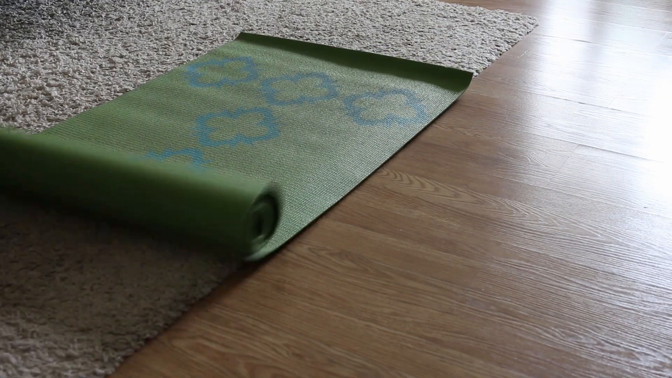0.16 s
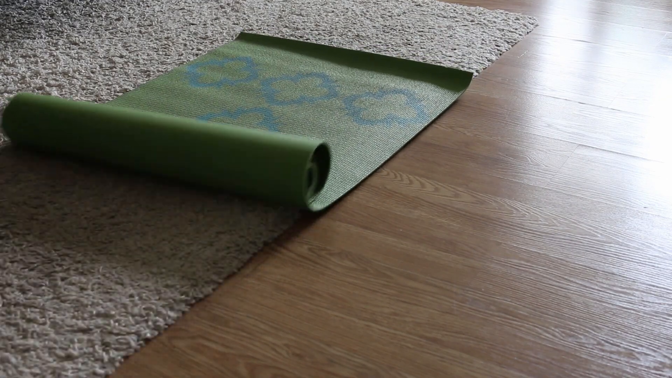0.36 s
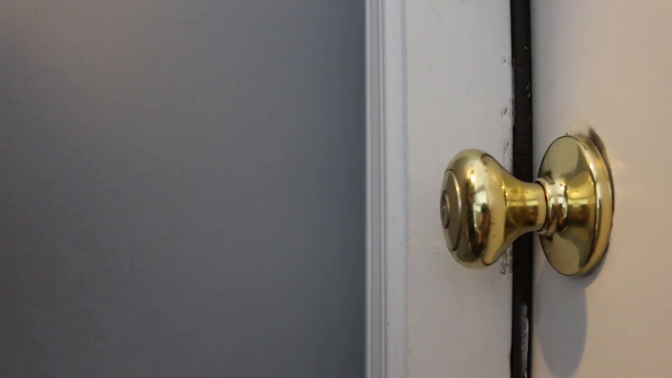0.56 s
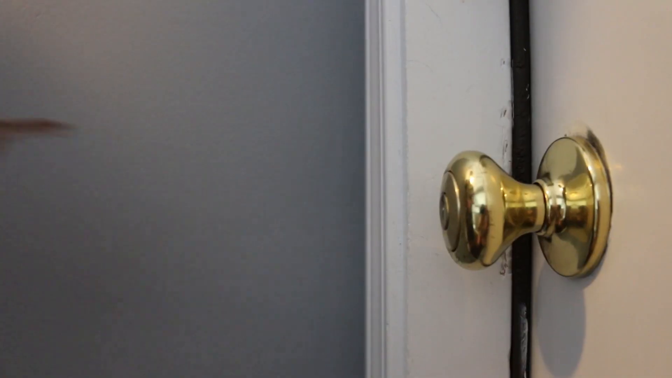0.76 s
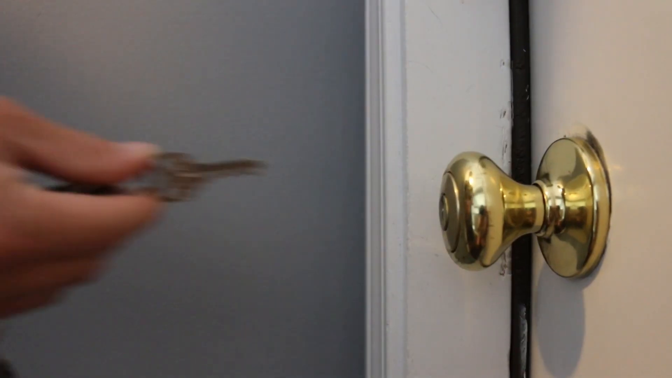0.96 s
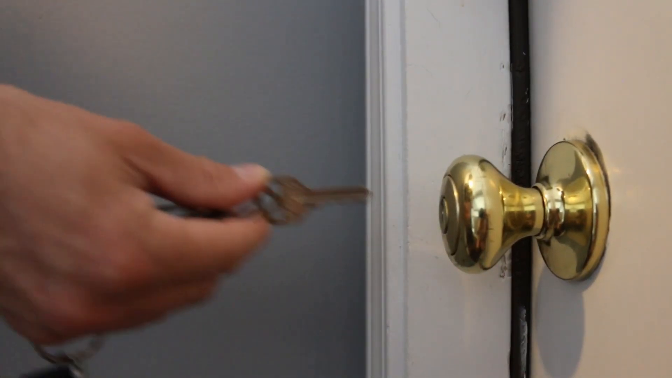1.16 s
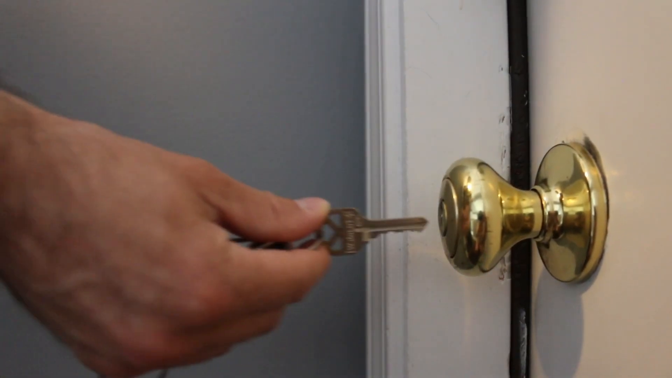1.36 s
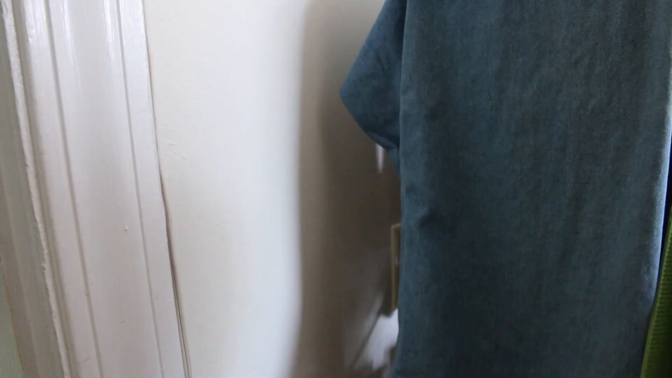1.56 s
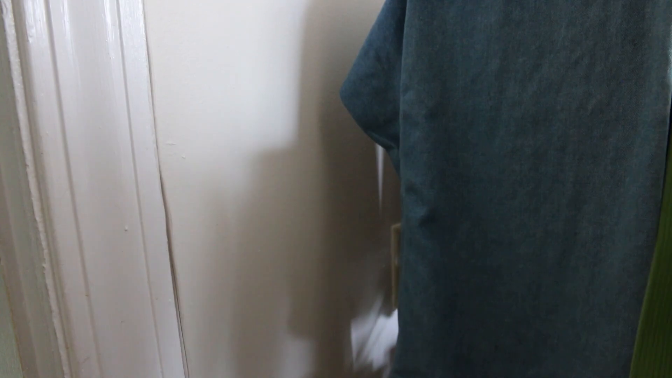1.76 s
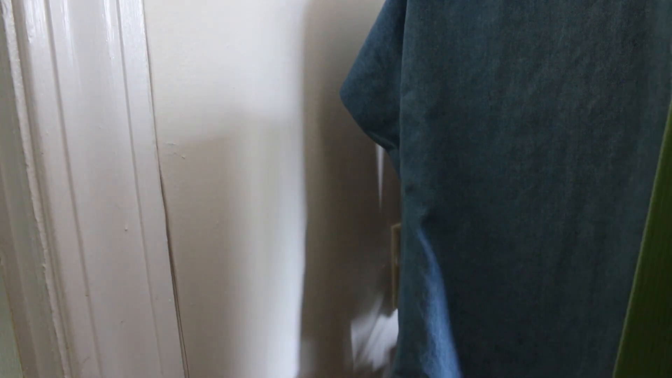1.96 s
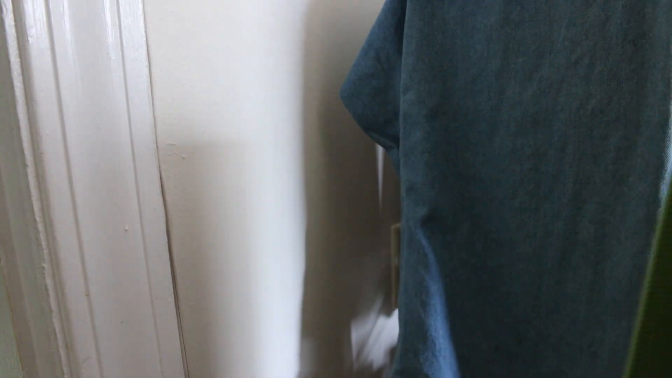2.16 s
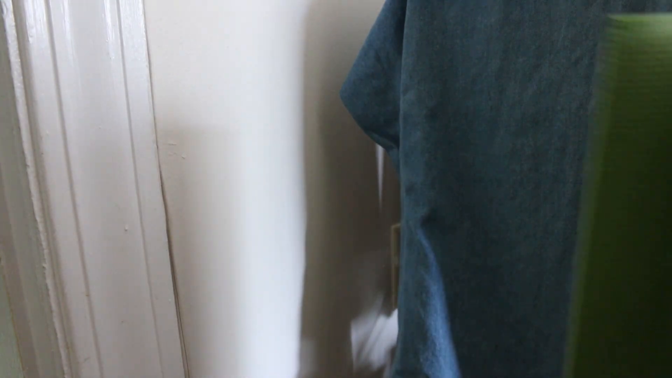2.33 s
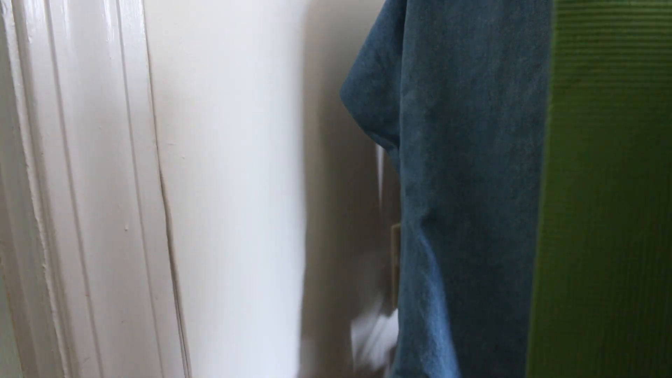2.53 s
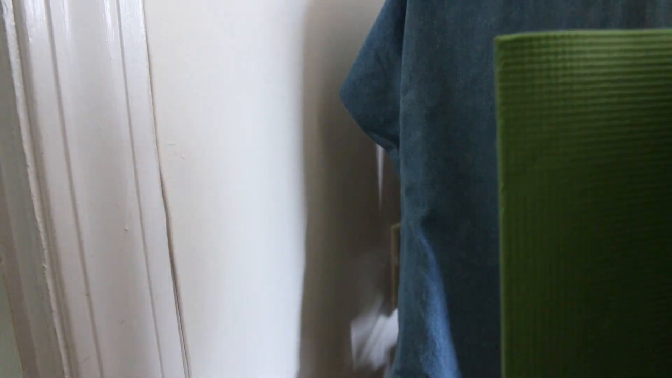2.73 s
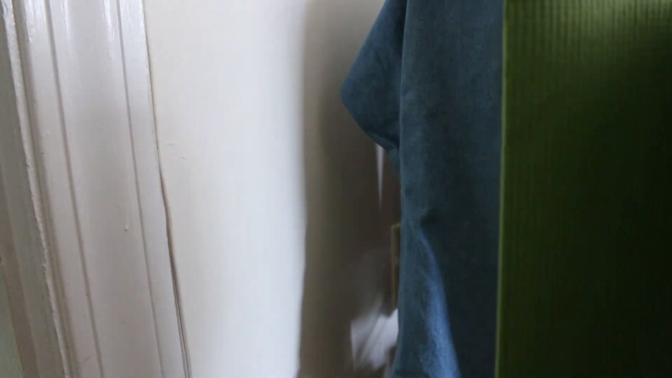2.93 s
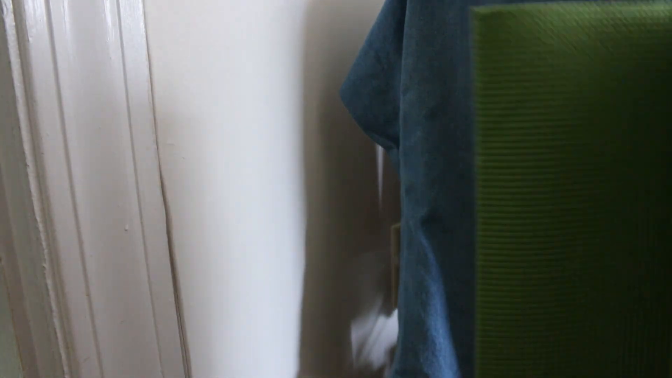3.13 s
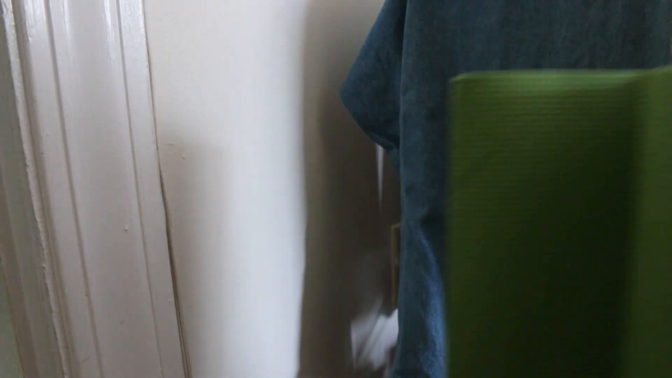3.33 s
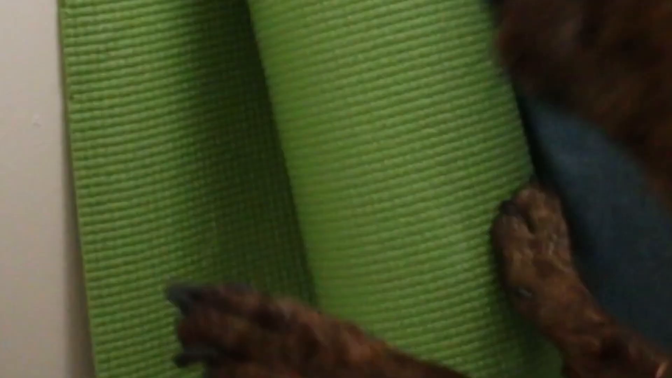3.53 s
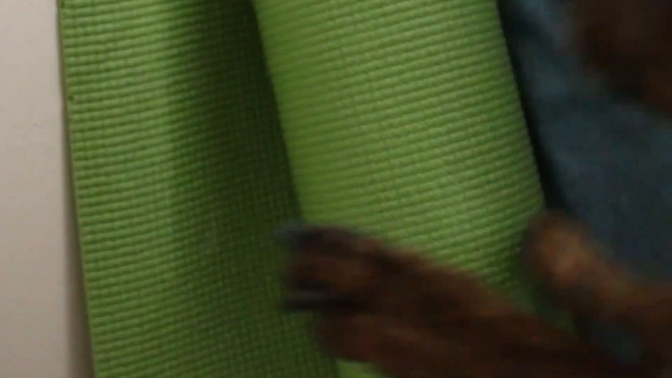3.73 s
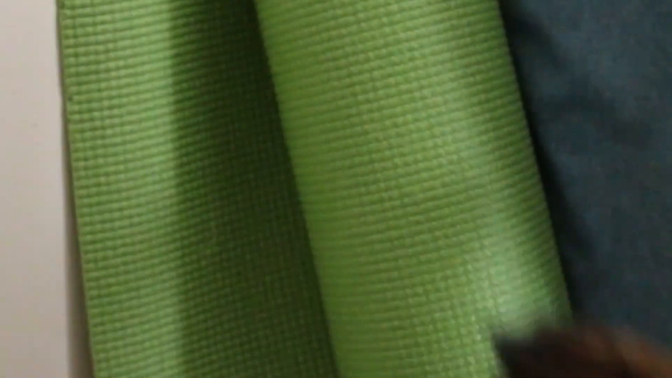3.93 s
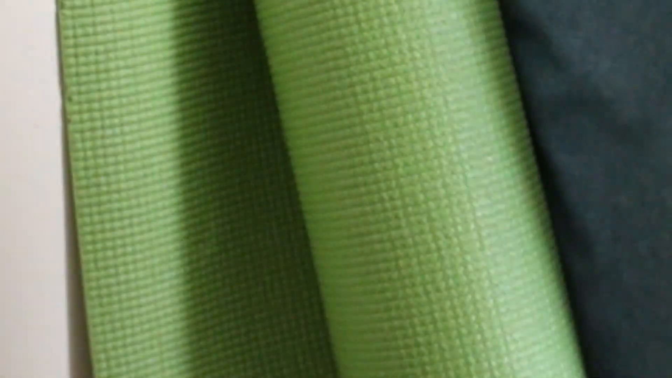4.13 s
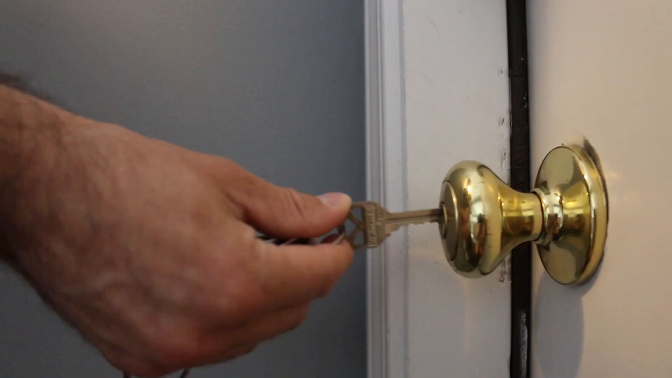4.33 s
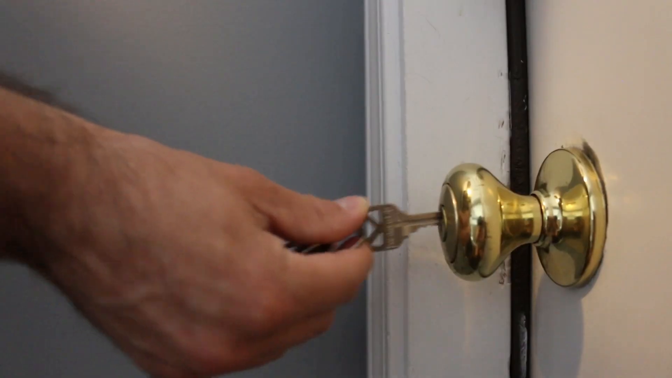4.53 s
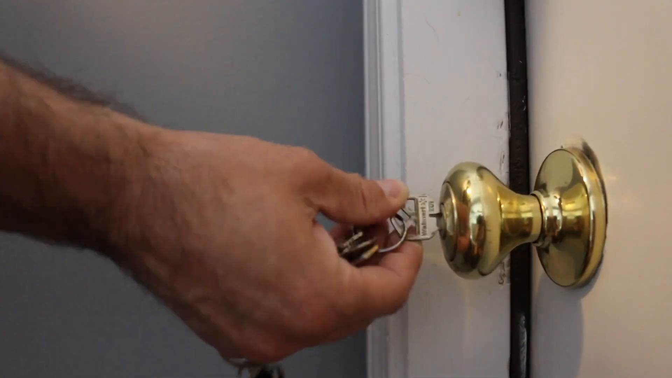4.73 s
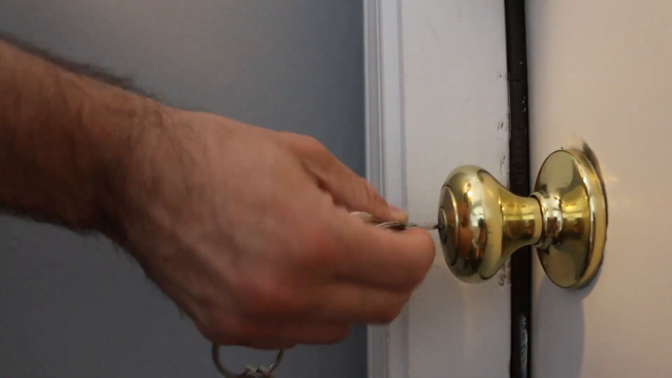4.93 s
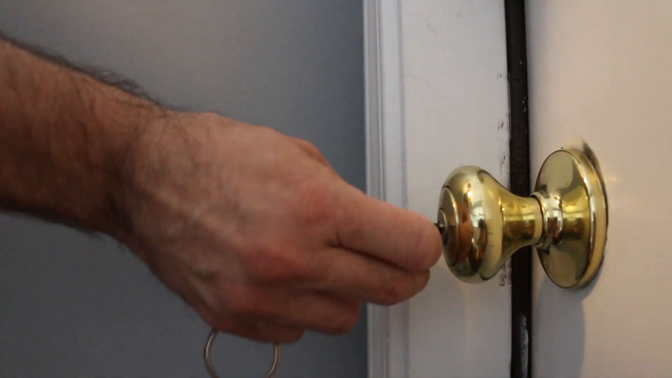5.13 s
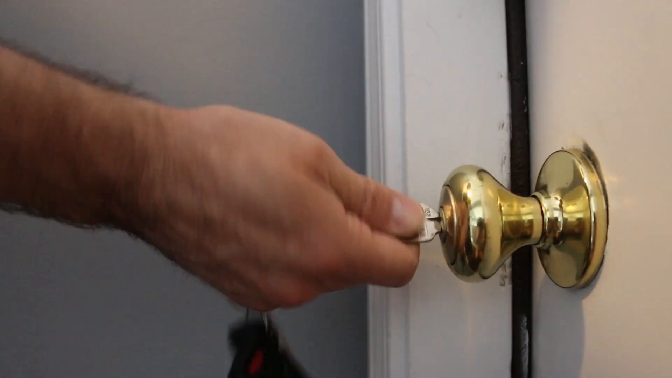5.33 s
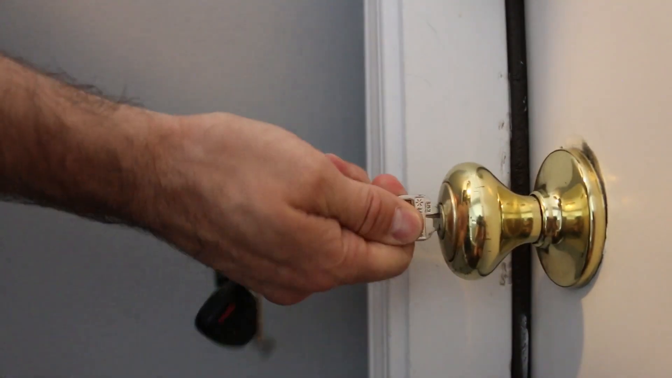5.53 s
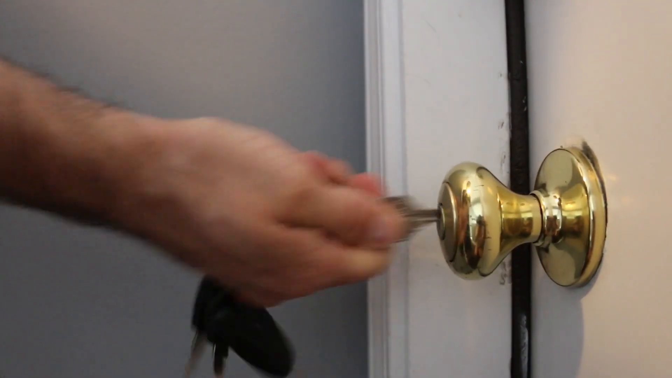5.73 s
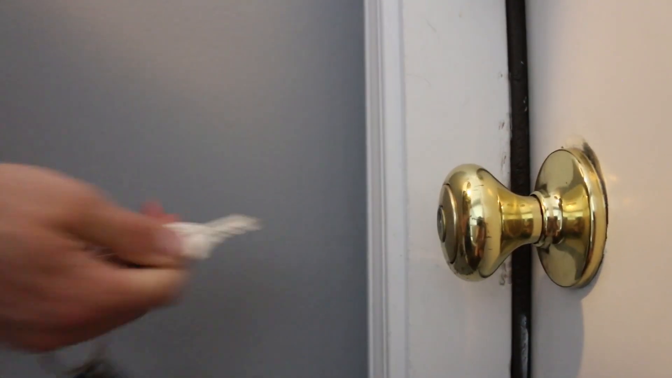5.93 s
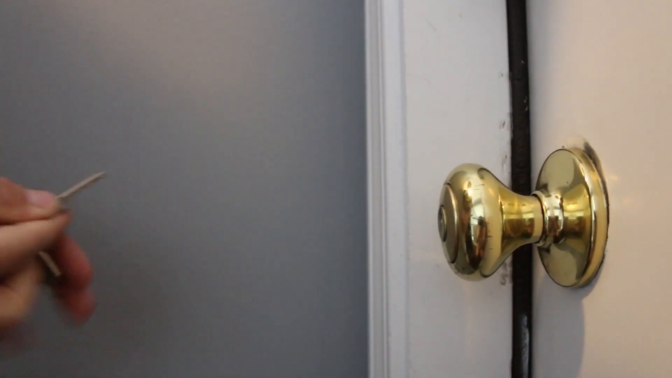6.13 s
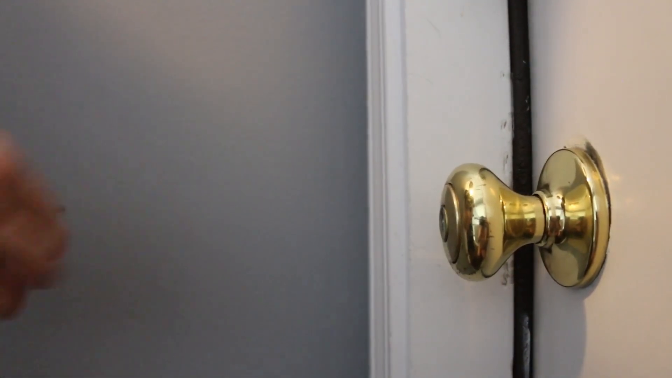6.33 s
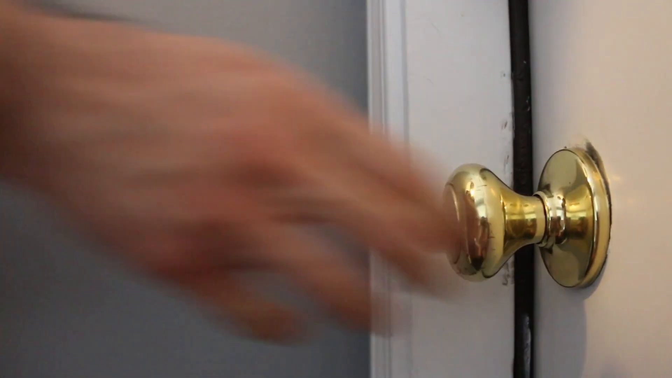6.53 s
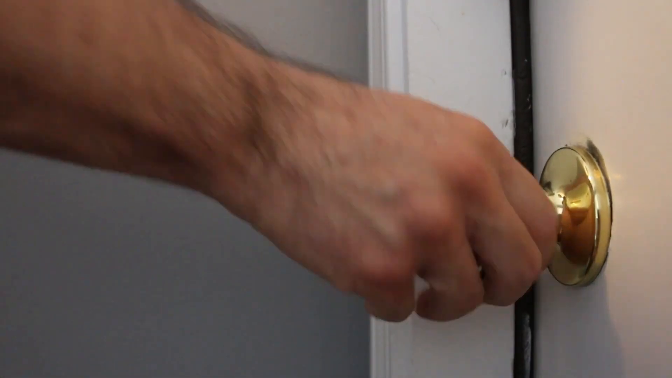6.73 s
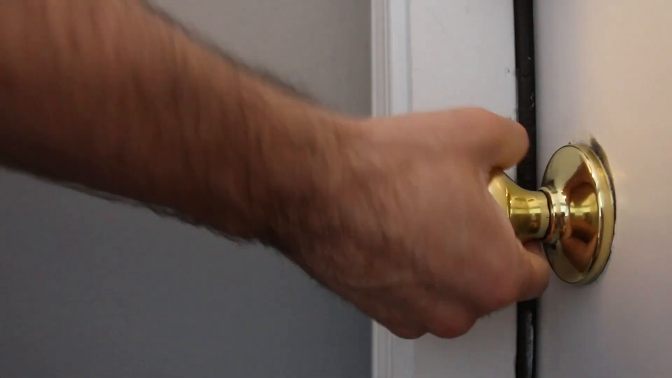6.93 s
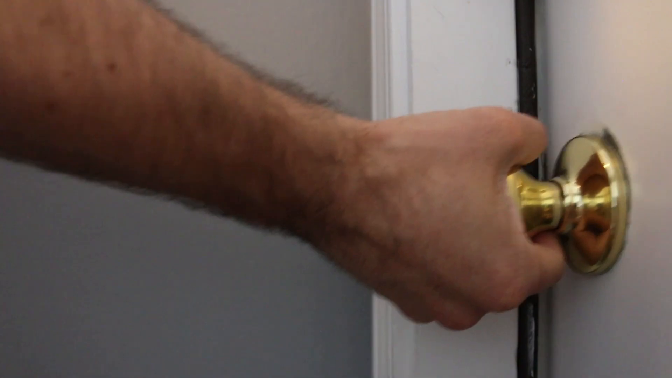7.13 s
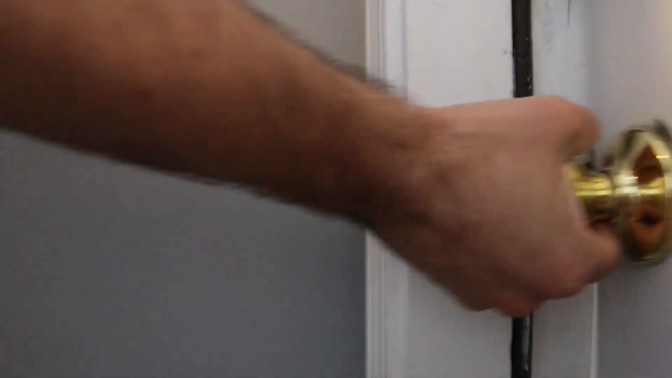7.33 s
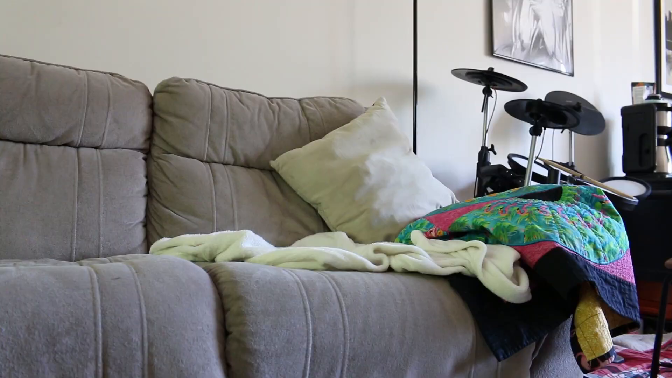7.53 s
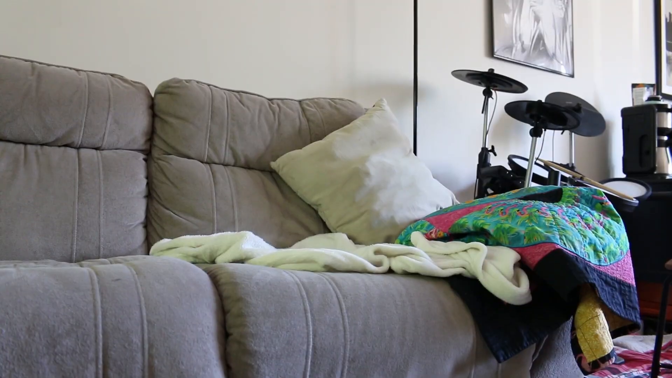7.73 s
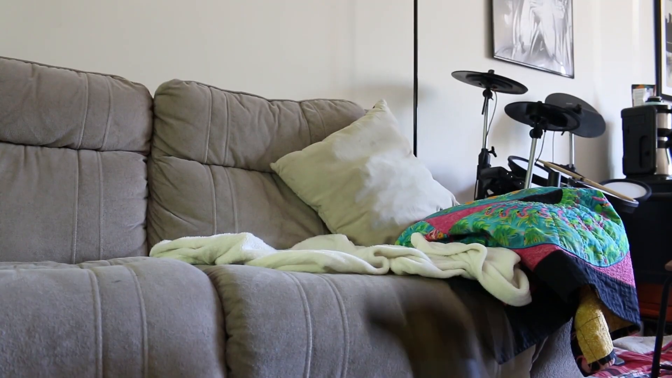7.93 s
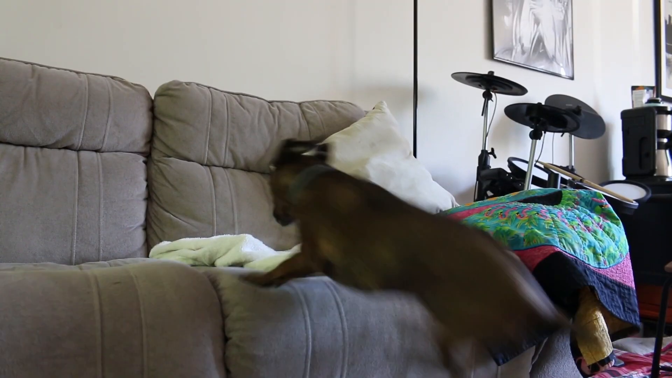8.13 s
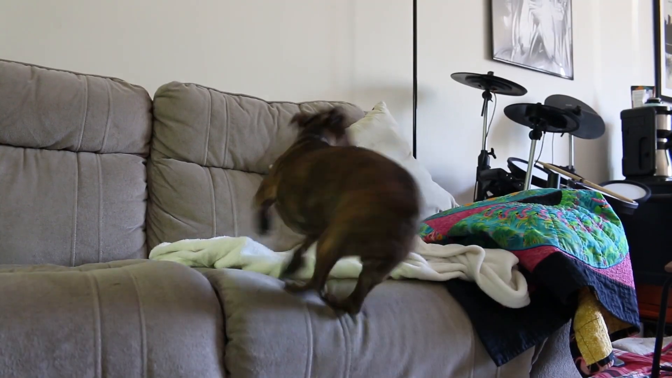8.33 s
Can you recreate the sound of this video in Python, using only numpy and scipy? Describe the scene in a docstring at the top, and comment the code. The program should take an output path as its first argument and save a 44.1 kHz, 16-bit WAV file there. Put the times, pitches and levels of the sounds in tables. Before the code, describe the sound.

From 0 to 0.55 s a foam mat rubs softly with a dull bump over a low steady indoor hum. A hard cut to a doorway brings faint traffic, a faint insect shimmer and small key clinks until 1.56 s. Indoors again, cloth and foam brush, with a cluster of dull knocks and scuffs at 2.3-2.7 s, lighter rubs around 3-3.6 s, and pawing scratches and taps at 3.9-4.2 s. At 4.36 s, outside, a key slides in with pin clicks and wooden thuds until 4.9 s, turns with small clunks at 5.1-5.6 s, and pulls out at 5.7-5.9 s. Keys jingle brightly at 5.9-6.5 s. From 6.8 s the knob rattles, strongest near 7.2 s; the door shudders low and its hinge squeaks at 7.5 s. After 7.57 s, soft paw thumps and fabric rustle in a quieter room, close and lightly reverberant.

```python
"""Indoors, over a hum, a foam mat is rolled, put away in a closet and pawed by a dog. By turns, outside a
wooden door over far traffic, keys clink; one slides into the knob's lock, turns and comes out; the knob is
twisted and the door pushed open with a hinge squeak. Keys are decaying sine modes; lock, door and bumps are
noise bursts and random slips through resonances; mat, cloth and fur are slips through smooth spectra; hinge
and whistles are gliding sines; the backgrounds are steadily coloured stereo noise."""
import sys
import numpy as np
from scipy import signal
from scipy.fft import rfft, irfft, next_fast_len
from scipy.io import wavfile
from scipy.ndimage import uniform_filter1d

SR = 44100
rng = np.random.default_rng(int(sys.argv[2]) if len(sys.argv) > 2 else 0)


def log_audio(samples):
    """Write samples as a 16-bit WAV file to the path given in sys.argv[1]."""
    # one column per channel
    frames = np.atleast_2d(samples).T
    # limit to full scale, then quantise
    limited = np.clip(frames, -1, 1)
    pcm = np.round(limited * 32767).astype(np.int16)
    wavfile.write(sys.argv[1], SR, pcm)


N = 369116
TIME_S = np.arange(N) / SR
PORTS = np.array([[1], [-1]])  # sign of the left and right microphone port


def amp(db):
    """Amplitude ratio of a level in dB."""
    return 10 ** (np.asarray(db) / 20)


def unit(x):
    """Scale to rms 1."""
    return x / np.sqrt(np.mean(x ** 2) + 1e-20)


def along(points, hz):
    """Interpolate (f/Hz, value) points on a log frequency axis."""
    f, v = np.transpose(points)
    return np.interp(np.log(hz + 1), np.log(f + 1), v)


def curves(rows):
    """One value per sample for each column after the time."""
    t_s, *columns = np.transpose(rows)
    return [np.interp(TIME_S, t_s, column) for column in columns]


def filtered(x, response):
    """Multiply the spectrum of x by a complex response of frequency."""
    m = next_fast_len(N + SR // 4)
    return irfft(rfft(x, m) * response(np.fft.rfftfreq(m, 1 / SR)), m)[..., :N]


def body(modes):
    """Causal response of (f/Hz, width/Hz, level/dB) resonances, alternating in sign."""
    def response(f):
        total = 0
        for k, (centre, width, db) in enumerate(modes):
            resonance = 1j * f * width / (centre * centre - f * f + 1j * f * width)
            total = total + (-1) ** k * amp(db) * resonance
        return total
    return response


def colour(points):
    """Zero-phase response through (f/Hz, level/dB) points."""
    return lambda hz: amp(along(points, hz))


def power_gain(response):
    """Rms that a response gives to white noise of rms 1."""
    hz = np.linspace(1, SR / 2, num=20000)
    return np.sqrt(np.mean(np.abs(response(hz)) ** 2))


def struck(drive, response):
    """Drive a body, normalized so that white noise keeps its rms."""
    return filtered(drive, response) / power_gain(response)


def grit(rate_per_s, spread_db):
    """Friction: random slips of uneven size, rms 1."""
    slips = rng.random(N) < rate_per_s / SR
    sizes = rng.standard_normal(N) * amp(spread_db * rng.exponential(size=N))
    return unit(slips * sizes)


def bursts(times_s, dbs, t60s, centres_hz=None, sharp=1):
    """Noise puffs with sharp onset and exponential decay, each optionally band-passed at its own pitch."""
    out, t = np.zeros(N + SR), np.arange(SR // 8) / SR
    onset = 1 - np.exp(-t / 0.00078)
    for k, (start_s, db, t60) in enumerate(zip(times_s, dbs, t60s)):
        puff = rng.standard_normal(len(t))
        if centres_hz is not None:
            peak = signal.iirpeak(np.clip(centres_hz[k], 100, .4 * SR), sharp, SR)
            puff = unit(signal.lfilter(*peak, signal.lfilter(*peak, puff)))
        decay = amp(db - 60 * t / np.clip(t60, .004, .15))
        out[round(start_s * SR):][:len(t)] += decay * onset * puff
    return out[:N]


# nearby walls [f/Hz, t60/s]
WALL_T60 = [(1000, 0.31), (5000, 0.12), (15000, 0.084)]
# left-right likeness of diffuse sound [f/Hz, correlation]
PORT_LIKENESS = [(60, 0.99), (180, 0.96), (550, 0.76), (1650, 0.43), (4970, -0.15), (15000, 0.29)]


def placed(x, lag_samples, pan_db, wet_db):
    """A source reaches two ports with a lag and level difference, then the walls answer diffusely."""
    hz, t, z = signal.stft(rng.standard_normal((2, SR // 4)), SR, nperseg=256)
    bass_loss = (hz / (hz + 700))[:, None] ** 2  # light walls let the bass through
    z = z * amp(-60 * t / along(WALL_T60, hz)[:, None]) * bass_loss
    share = np.clip(along(PORT_LIKENESS, hz), 0, 1)[:, None]  # bass reaches both ports alike
    z[1] = share * z[0] + np.sqrt(1 - share ** 2) * z[1]
    tail = signal.istft(z, SR, nperseg=256)[1]
    late = np.pad(np.atleast_2d(x), ((0, 0), (200, 0)))  # samples before the walls answer
    wet = signal.fftconvolve(late, tail / np.linalg.norm(tail[0]), axes=1)[:, :N]
    direct = filtered(x, lambda f: np.exp(-1j * np.pi * f * lag_samples * PORTS / SR))
    return amp(pan_db / 2 * PORTS) * (direct + amp(wet_db) * wet)


# key against key, levels before trim; place of the blow along a row whose keys sit at 0-4 (may lie beyond it)
# [t/s, tick level/dB, fob level/dB, split ring level/dB, keys level/dB, place]
KEY_CLINKS = [(0.5634, -46, -46, -61, -58, 3), (0.6387, -59, -57, -68, -69, 2.4),
              (0.6736, -38, -44.5, -31, -53, 2), (0.7248, -50, -51, -68, -73, 2),
              (0.7794, -52, -52, -60, -74, -1), (1.026, -47, -53, -57, -75, .4),
              (1.2885, -38.5, -54, -56, -70, 3), (4.5287, -36, -42.5, -47.5, -58, -7),
              (4.572, -39, -51, -65, -59, 2.4), (4.6997, -28, -30, -50, -36, 2.2),
              (4.706, -45, -45, -50, -25.5, 0.5), (4.7194, -37, -34.5, -38, -26, 0.8),
              (4.8358, -52, -55, -65, -50, 2), (4.9144, -38, -38.5, -48, -61, 2.4),
              (4.9703, -37, -41.5, -56, -61, 4), (5.1104, -54, -64, -57, -51, -3),
              (5.1422, -45, -52, -56, -70, -1), (5.2026, -46, -59, -62, -63, 6),
              (5.3644, -45, -60, -53, -55, 3), (5.43, -53, -67, -55, -54, 1.5),
              (5.5105, -42, -48.5, -51, -67, 2), (5.9, -55, -61.5, -55, -58, 5),
              (5.9194, -47, -64, -51, -54, 3), (5.9678, -26.5, -60, -42, -40, 3),
              (6.0036, -32, -56, -43, -29, -1.5), (6.0118, -40, -49, -46, -16.5, 3),
              (6.0184, -34, -41.5, -51, -24.5, 0.3), (6.0829, -30, -44.5, -35, -16.5, 2.3),
              (6.1178, -36, -55, -41, -29, 1.1), (6.1344, -48, -52, -43, -25.5, -0.5),
              (6.1746, -23, -37, -40, -25, 2), (6.193, -44, -46, -52, -39, 1),
              (6.2285, -18, -44, -36, -14.5, -1.5), (6.2794, -49, -40.5, -53, -42, 3),
              (6.2996, -25.5, -52, -52, -46, 6), (6.3304, -30, -56, -59, -41, 2.6),
              (6.341, -25, -50, -36.5, -29, 9), (6.35, -34, -44, -48, -19, 5),
              (6.3597, -21.5, -53, -43, -28, -1), (6.4023, -19, -32.5, -43, -32, 5),
              (6.4242, -25, -53, -45, -41, 0.2), (6.4844, -42, -45, -58, -61, 5),
              (6.5827, -38.5, -51, -49, -56, 5), (6.6188, -39.5, -46.5, -50, -68, 4),
              (6.9015, -47, -28, -43, -57, 5)]
# modes of fob, split ring and five keys, one list each [f/Hz, relative level/dB, nominal t60/s]
KEY_MODES = [
    [(2620, -1, 0.035), (3080, -2.5, .035), (2200, -9, 0.047)],
    [(8500, 2.5, 0.05)],
    [(9900, -2, 0.1), (6440, -10, 0.11), (7100, -12, 0.064)],
    [(10880, 0, 0.1), (7000, -13, 0.2), (11700, -9, 0.045)],
    [(14250, -1.5, .09), (13900, -5, .06)],
    [(14200, -4, 0.055), (14580, -8, .06), (9200, -14, 0.047)],
    [(15250, 2, .05), (15150, -1, .05)],
]
# metal scrape, also colours the key ticks [f/Hz, relative level/dB]
METAL_SPECTRUM = [(1180, -8.5), (2000, -3), (4050, 0), (4380, 0.5), (7120, -0.5), (7770, -1.5), (11100, 0),
                  (14700, 1.5), (16000, -29)]
KEY_SCATTER_DB, FREEDOM_SCATTER = 2.5, .2  # chance in each key's blow; in log ring time of the bunch
NEIGHBOUR_DB, REACH_KEYS = 10, 1.5  # loss per key away from the blow, up to this many keys
CLENCH_DB, CLENCH_PER_DB = -25, 0.041  # harder ticks come from a tighter bunch: log ring time lost per dB


def key_rings():
    """Clinks excite decaying modes that flutter in the hand and reach each port in its own phase."""
    out, t = np.zeros((2, N + SR)), np.arange(SR // 8) / SR
    rise = 1 - np.exp(-t / 0.00013)
    lucks = rng.standard_normal((len(KEY_CLINKS), 6))
    for (start_s, tick_db, fob_db, ring_db, keys_db, place), luck in zip(KEY_CLINKS, lucks):
        away = np.minimum(np.abs(np.arange(len(KEY_MODES) - 2) - place), REACH_KEYS)
        each_key_db = keys_db - NEIGHBOUR_DB * away + KEY_SCATTER_DB * luck[1:]
        clench = CLENCH_PER_DB * max(tick_db - CLENCH_DB, 0)
        freedom = np.exp(FREEDOM_SCATTER * luck[0] - clench)
        drift_rad = np.cumsum(rng.normal(0, .035, len(t)))
        for strike_db, modes in zip([fob_db, ring_db, *each_key_db], KEY_MODES):
            knots_s = np.linspace(0, t[-1], num=14)
            flutter_db = np.interp(t, knots_s, rng.normal(0, 2.4, size=14)) * np.minimum(t / 0.0083, 1)
            for hz, mode_db, t60 in modes:
                detuned_hz = hz * (1 + rng.normal(0, .005))
                phase = 2 * np.pi * detuned_hz * t + drift_rad + rng.uniform(-.9, .9) * PORTS
                scatter_db = rng.normal(0, abs(0.5 - 0.047 * mode_db))  # weak modes vary most
                level_db = strike_db + 7.0 + mode_db + scatter_db
                envelope = amp(level_db + flutter_db - 60 * t / (freedom * t60)) * rise
                out[:, round(start_s * SR):][:, :len(t)] += envelope * np.sin(phase)
    return out[:, :N]


def key_ticks():
    """Each contact is a metallic noise tick, followed by two smaller narrow-band contacts."""
    t_s, tick_db = np.transpose(KEY_CLINKS)[:2]
    long_ticks = bursts(t_s, tick_db - 2.5, 0.046 + 0 * t_s)
    short_ticks = bursts(t_s, tick_db - 18.0, 0.0022 + 0 * t_s)
    ticks = struck(long_ticks + short_ticks, colour(METAL_SPECTRUM))
    t_s, tick_db = np.repeat(t_s, 2), np.repeat(tick_db, 2)
    after_s = t_s + rng.uniform(0, 0.052, len(t_s))
    pitch_hz = rng.uniform(5500, 15600, len(t_s))
    return ticks + bursts(after_s, tick_db - 14, 0.06 + 0 * t_s, pitch_hz, sharp=30)


# a hand works lock and door: key in, key turned, key out, knob twisted, door pushed; one list per move
# [t/s, force level/dB, door edge level/dB, metal scrape level/dB], before trim
HAND_MOVES = [
    [(4.36, -39, -53, -67), (4.392, -48, -44.5, -74), (4.478, -44, -63, -75), (4.526, -37.5, -37, -69),
     (4.586, -28.5, -34, -48), (4.708, -21, -28, -27.5), (4.79, -25.5, -25.5, -45),
     (5.06, -43.5, -53.5, -62)],
    [(5.06, -42, -44, -65.5), (5.1, -42, -43, -71), (5.154, -46, -52, -55), (5.178, -50.5, -43.5, -69),
     (5.384, -25.5, -40.5, -53), (5.514, -39.5, -48.5, -55), (5.532, -26.5, -40, -68),
     (5.68, -55, -51.5, -65)],
    [(5.68, -58, -58, -63), (5.7, -35.5, -39, -98), (5.774, -20, -24, -25), (5.876, -23.5, -28, -43.5),
     (6.03, -44, -53.5, -32.5), (6.226, -56.5, -63, -33.5), (6.536, -52.5, -57.5, -46.5),
     (6.72, -47, -60, -60)],
    [(6.72, -78, -55, -81), (6.786, -41.5, -46, -70), (6.858, -26, -36, -58), (6.886, -33.5, -36, -55),
     (6.98, -23.5, -33, -34), (6.996, -34.5, -29.5, -47), (7.038, -35.5, -38, -50), (7.13, -42, -39, -49)],
    [(7.13, -31.5, -43, -38), (7.164, -23.5, -23.5, -53), (7.23, -22, -26, -39), (7.386, -17.5, -37, -34),
     (7.442, -24, -42, -38), (7.48, -22, -30.5, -51), (7.546, -32.5, -44, -40.5), (7.57, -29, -39, -54)],
]
# how each move takes the force up [door swing level/dB, door panel level/dB, lock case level/dB]
FORCE_SHARES = [(-12, -4.5, -8), (-18.5, -2.5, -14), (-14, -6, -13), (-10.5, -9, -4), (-16, -7.5, -2.5)]


def effort_db():
    """Force sets the levels of swing, panel and case; edge and scrape follow levels of their own."""
    rows = [(4.3, -85, -90, -88, -88, -88)]
    for move, share_db in zip(HAND_MOVES, FORCE_SHARES):
        for t_s, force_db, edge_db, scrape_db in move:
            rows.append((t_s, *(force_db + np.array(share_db)), edge_db, scrape_db))
    return curves(rows)


# blows in the lock, before trim
# [t/s, case level/dB, case f/Hz, panel level/dB, snap level/dB, nominal t60/s]
LOCK_BLOWS = [(1.528, -29.5, 900, -31, -55, 0.23), (4.458, -34, 821, -46, -69, .04),
              (4.518, -35, 694, -8.5, -68, 0.015), (4.586, -34, 925, -39, -29.5, 0.03),
              (4.618, -25, 683, -17.5, -31, 0.054), (4.645, -41, 872, -8, -30, 0.055),
              (4.673, -37, 1000, -35, -30, 0.044), (4.698, -12.5, 1720, -17.5, -18.5, 0.041),
              (4.727, -12, 980, -14, -32, 0.047), (4.816, -12.5, 690, -41, -52, 0.032),
              (4.849, -9.5, 2100, -47, -41, 0.02), (4.914, -21, 2600, -15, -27, 0.018),
              (5.083, -26, 1000, -32, -60, 0.054), (5.257, -32, 953, -48, -30.5, 0.11),
              (5.324, -25, 930, -24, -45, 0.21), (5.373, -35, 990, -40, -35.5, 0.033),
              (5.401, -18, 820, -44, -36, 0.031), (5.518, -25, 660, -36, -55, 0.051),
              (5.554, -24, 650, -32, -59, 0.041), (5.698, -13, 980, -1.5, -57, 0.038),
              (5.757, -11.5, 1030, -4.5, -22, 0.085), (5.78, -5.5, 930, -5.5, -26, 0.042),
              (5.897, -37, 770, -32, -29.5, .047), (6.797, -12, 2400, -42, -71, 0.016),
              (6.845, -16.5, 910, -20, -46, 0.049), (6.901, -20, 2580, -33, -39, 0.067),
              (6.922, -20, 700, -16, -19.5, 0.03), (6.944, -17, 1080, -11, -26, 0.078),
              (7.092, -21.5, 1530, -24, -59, 0.12), (7.153, -13, 1130, -5, -54, 0.083),
              (7.203, 2, 1620, -9, -75, 0.051), (7.241, -3.5, 795, -52, -29.5, 0.062),
              (7.271, -7.5, 1020, -31, -36, 0.086), (7.299, -4.5, 920, -41, -36, 0.1),
              (7.38, -8.5, 980, -25, -27, 0.035)]
# knob and latch [f/Hz, width/Hz, relative level/dB]
CASE_MODES = [(468, 110, -2), (652.4, 34.6, 7.5), (778, 210, -2), (1023.5, 47, 4), (1195, 160, -9.5),
              (1580, 520, -11.5), (2470, 336, -9.5), (2530, 640, -13.5), (3550, 990, -27)]
PIN_HZ, LATCH_HZ = 12100, 4720  # snap pitch: pins under the sliding blade, else the latch
PINS_START_S, PINS_END_S = 4.55, 4.75


def lock(case_db):
    """Rattle and blows shake the case; pitched puffs add the knock, pin or latch snap and metal crack."""
    t_s, blow_db, blow_hz, _, snap_db, t60 = np.transpose(LOCK_BLOWS)
    snap_hz = np.where((t_s > PINS_START_S) & (t_s < PINS_END_S), PIN_HZ, LATCH_HZ)
    drive = amp(case_db) * grit(3000, 1.6) + bursts(t_s, blow_db - 10.5, t60)
    case = struck(drive, lambda f: body(CASE_MODES)(f) / (1 + 1j * f / 4000) ** 2)
    knocks = bursts(t_s, blow_db - 10.5, 1.06 * t60, blow_hz, sharp=2.43)
    snaps = bursts(t_s, snap_db - 16, 1.2 * t60, snap_hz, sharp=1.9)
    cracks = bursts(t_s, blow_db - 20.0, 0.95 * t60, 2300 + 0 * t_s, sharp=1.45)
    return case + knocks + snaps + cracks


# door panel [f/Hz, width/Hz, relative level/dB]
PANEL_MODES = [(146.9, 6.6, 2.5), (177, 31, -9), (236.1, 9.1, -3.5)]
# door near its lock [f/Hz, width/Hz, relative level/dB]
EDGE_MODES = [(293.7, 13.6, -0.5), (400, 280, -18.5)]


def panel_and_edge(panel_db, edge_db):
    """Lock thuds and friction ring the panel and the door edge."""
    t_s, _, _, thud_db, _, t60 = np.transpose(LOCK_BLOWS)
    thuds = bursts(t_s, thud_db - 1.5, 1.04 * t60)
    panel = struck(amp(panel_db) * grit(1500, 0.68) + thuds, body(PANEL_MODES))
    edge_drive = amp(edge_db + 2.5) * grit(1500, 0.57) + amp(-20.0) * thuds
    return panel + struck(edge_drive, body(EDGE_MODES))


# hand on knob [f/Hz, relative level/dB]
KNOB_SPECTRUM = [(1760, -1.5), (3000, -2.5), (5070, -8.5), (8110, -16), (14600, -28), (16000, -17)]
ON_KNOB = TIME_S > 6.7  # the key is gone, the bare hand turns the knob


def metal_scrape(scrape_db):
    """Slips and snaps of metal, coloured by the key and then by the knob."""
    t_s, _, _, _, snap_db, t60 = np.transpose(LOCK_BLOWS)
    rub = amp(scrape_db - 11.0) * grit(8300, 0.62) + bursts(t_s, snap_db - 2.0, 0.93 * t60)
    key = struck(rub * ~ON_KNOB, colour(METAL_SPECTRUM))
    knob = struck(rub * ON_KNOB, colour(KNOB_SPECTRUM))
    return key + amp(7.5) * knob


# a push on door or floor [f/Hz, width/Hz, relative level/dB]
SHOVE_MODES = [(46, 26, -0.5), (89, 36, 3)]
SWING_HZ = 71.8  # the door flexing as a whole while the knob is worked and after it comes free
FREED_S = 7.153  # the latch lets the door go
FLEX_S, FLEX_DB, FLEX_RISE_DB_PER_S, FLEX_FALL_DB_PER_S = 7.34, -17, 45, 90  # extra flexing once freed


def door_swing(swing_db):
    """The whole door shoves under the hand and, from the knob's turn on, flexes at one wandering low pitch."""
    wander_rad = np.cumsum(rng.normal(0, 0.012, N))
    flexing = ON_KNOB * np.sin(2 * np.pi * SWING_HZ * TIME_S + wander_rad)
    late_s = TIME_S - FLEX_S
    flex_db = FLEX_DB + np.minimum(FLEX_RISE_DB_PER_S * late_s, -FLEX_FALL_DB_PER_S * late_s)
    flex_level = amp(swing_db) + amp(flex_db) * (TIME_S > FREED_S)
    shove_level = amp(swing_db + 0.5 - 5.4 * ON_KNOB)
    return flex_level * flexing + shove_level * struck(grit(800, 1.2), body(SHOVE_MODES))


def door():
    """Hand force drives lock, panel and whole door; door edge and scrape follow levels of their own."""
    swing_db, panel_db, case_db, edge_db, scrape_db = effort_db()
    wood = panel_and_edge(panel_db, edge_db) + door_swing(swing_db)
    return lock(case_db) + wood + metal_scrape(scrape_db)


# hinge, before trim [t/s, f/Hz, level/dB]
HINGE_GLIDE = [(7.49, 2936, -45), (7.544, 3140, -35), (7.567, 3210, -55)]


def hinge_squeak():
    """The hinge sings as a gliding sine with an octave and a lower partial."""
    hz, db = curves([(7.485, 2930, -80)] + list(HINGE_GLIDE))
    phase = 2 * np.pi * np.cumsum(hz) / SR
    return amp(db + 3) * (np.sin(phase) + amp(-21) * np.sin(2 * phase) + amp(-3) * np.sin(.35 * phase))


# thin whistles while the key turns back, and a short creak of the door
# [start t/s, end t/s, start f/Hz, end f/Hz, level/dB]
LOCK_WHISTLES = [(5.44, 5.54, 12700, 12000, -59), (5.56, 5.698, 13400, 12100, -62),
                 (5.58, 5.7, 11100, 10500, -67), (7.4, 7.44, 2020, 2230, -29.5)]


def whistles():
    """Whistles and creak: short sines sliding linearly in pitch."""
    out = np.zeros(N)
    for start_s, end_s, start_hz, end_hz, level_db in LOCK_WHISTLES:
        size = round((end_s - start_s) * SR)
        phase = 2 * np.pi * np.cumsum(np.linspace(start_hz, end_hz, num=size)) / SR
        out[round(start_s * SR):][:size] += amp(level_db) * np.hanning(size) ** 0.26 * np.sin(phase)
    return out


# strokes of mat, cloth and fur, before trim [start t/s, rise/s, hold/s, body level/dB, hiss level/dB]
RUB_STROKES = [(0.0, 0.022, 0.016, -40.5, -52), (0.09, 0.023, 0.026, -36, -52),
               (0.28, 0.29, 0.45, -52.5, -77), (1.568, 0.21, 0.074, -48.5, -58),
               (2.331, 0.014, 0.011, -34, -55), (2.41, 0.01, 0.0058, -33, -42.5),
               (2.54, 0.012, 0.0045, -34.5, -54), (2.733, 0.043, 0.7, -56.5, -62.5),
               (2.995, 0.13, 0.027, -49.5, -51), (3.288, 0.048, 0.019, -47.5, -52.5),
               (3.6, 0.017, 0.17, -54, -54), (3.869, 0.0088, .012, -48, -49), (3.988, 0.02, .3, -58, -59.5),
               (7.654, 0.025, .03, -55.5, -75), (7.7, 0.035, 0.017, -52.5, -52.5),
               (7.799, 0.052, 0.066, -47.5, -61), (7.98, 0.064, 0.064, -55, -57.5)]
RISE_DB, FADE_DB_PER_S = 14, 119  # a stroke starts this far below its level


def rubbing_db():
    """Strokes swell, hold and fade; their powers add to levels of body and hiss."""
    power = np.zeros((2, N))
    for start_s, rise_s, hold_s, *level_db in RUB_STROKES:
        since_s = TIME_S - start_s
        swell_db = np.where(since_s < 0, -90, np.minimum(RISE_DB * (since_s / rise_s - 1), 0))
        fade_db = FADE_DB_PER_S * np.maximum(since_s - rise_s - hold_s, 0)
        power += amp(2 * (np.array(level_db)[:, None] + swell_db - fade_db))
    return 10 * np.log10(power)


# indoor bumps and paw blows, before trim
# [t/s, knock level/dB, knock f/Hz, thump level/dB, thump f/Hz, snap level/dB, nominal decay/s]
INDOOR_BUMPS = [(0.095, -24, 600, -50, 207, -63, 0.19), (0.177, -40, 1000, -56, 250, -42, 0.065),
                (0.213, -37, 450, -60, 114, -63, 0.087), (0.318, -38, 765, -76, 129, -57, 0.2),
                (1.674, -32, 1140, -60, 113, -63, 0.066), (1.731, -28, 1120, -68, 116, -31, 0.03),
                (2.334, -18.5, 570, -40.5, 107, -40, 0.052), (2.352, -11.5, 1240, -45.5, 115, -52, 0.22),
                (2.417, -14.5, 1060, -33, 325, -35.5, 0.18), (2.543, -28, 484, -36, 199, -32, 0.043),
                (2.558, -5.5, 518, -32, 235, -40, 0.069), (2.577, -52.5, 500, -41, 62, -77, 0.2),
                (2.695, -14.5, 486, -40, 300, -57, 0.028), (3.416, -46, 415, -33, 67, -70, 0.079),
                (3.54, -22.5, 1290, -48, 116, -40, 0.027), (3.617, -31, 1800, -57, 130, -21, 0.057),
                (3.765, -40, 1730, -64, 111, -40, 0.16), (3.879, -18, 420, -39, 384, -18.5, 0.042),
                (4.044, -30, 510, -52, 105, -40, 0.048), (4.075, -30, 960, -53.5, 363, -22, 0.078),
                (4.187, -31.5, 547, -52, 202, -60, 0.054), (7.668, -22.5, 370, -31.5, 199, -64, 0.043),
                (7.84, -58, 397, -43.5, 100.4, -59, 0.15), (8.103, -43, 530, -59, 237, -54, 0.11),
                (8.13, -60, 400, -48.5, 45, -73, 0.11)]


def thumps():
    """Soft blows: a few cycles of a decaying sine with a round start."""
    out, t = np.zeros(N + SR), np.arange(SR // 5) / SR
    onset = 1 - np.exp(-t / 0.00066)
    for start_s, _, _, db, hz, _, decay_s in INDOOR_BUMPS:
        envelope = amp(db + 11.5 - 50 * t / decay_s) * onset
        out[round(start_s * SR):][:len(t)] += envelope * np.sin(2 * np.pi * hz * t)
    return out[:N]


# dull part of rubbing [f/Hz, relative level/dB]
RUB_BODY_SPECTRUM = [(29, -19), (50, -29), (162, -8), (319, -8), (573, -10.5), (628, -12.5), (1410, -15),
                     (1750, -20), (4000, -24.5), (5200, -35), (8800, -120)]
# bright part of rubbing and snaps [f/Hz, relative level/dB]
RUB_HISS_SPECTRUM = [(880, -64), (1500, -8.5), (2660, -7.5), (4640, -1.5), (5280, -2.5), (10200, -9),
                     (13800, -15), (16000, -21)]


def rubs_and_bumps():
    """Mat, cloth and fur rub as coloured slips; bumps add knocks, snaps, thumps and floor shoves."""
    body_db, hiss_db = rubbing_db()
    t_s, knock_db, knock_hz, thump_db, _, snap_db, t60 = np.transpose(INDOOR_BUMPS)
    rub = struck(amp(body_db) * grit(4000, 2.43), colour(RUB_BODY_SPECTRUM))
    knocks = bursts(t_s, knock_db - 10.5, t60, knock_hz, sharp=1.63)
    shoves = struck(bursts(t_s, thump_db + 7.0, 0.51 * t60), body(SHOVE_MODES))
    bright = amp(hiss_db - 0.5) * grit(9000, 3.45) + bursts(t_s, snap_db, 0.33 * t60)
    hiss = struck(bright, colour(RUB_HISS_SPECTRUM))
    dull = placed(rub + knocks + thumps() + shoves, lag_samples=3.4, pan_db=-0.6, wet_db=-5.0)
    return dull + placed(hiss, lag_samples=-1.96, pan_db=0.8, wet_db=0)


def air(response):
    """Diffuse stereo noise of rms 1, alike in the bass."""
    def mid_side(hz):
        angle = np.arccos(np.clip(along(PORT_LIKENESS, hz), -1, 1)) / 2
        return response(hz) * [np.cos(angle), np.sin(angle)]
    mid, side = filtered(rng.standard_normal((2, N)), mid_side)
    return unit(np.array([mid + side, mid - side]))


# far insect [t/s, level/dB]
INSECT_LEVEL = [(.6, -67), (.72, -55), (1.1, -60), (1.55, -81)]


def insect():
    """A far insect: noise through two resonances, swelling and fading."""
    level_db, = curves(INSECT_LEVEL)
    return amp(level_db) * air(body([(2150, 290, -1.5), (4460, 490, -0.54)]))


# appliance drone [f/Hz, width/Hz, relative level/dB]
HUM_MODES = [(113.9, 2.2, 12), (470, 9, -3.5)]


def hum(level_db):
    """Appliance drone: noise through narrow resonances."""
    return amp(level_db) * air(body(HUM_MODES))


# room tone [f/Hz, relative level/dB]
ROOM_SPECTRUM = [(15, -67), (25, -22), (114, -9.5), (256, -19.5), (277, -15), (607, -23.5), (754, -20.5),
                 (1440, -27), (16000, -39)]
# far traffic [f/Hz, relative level/dB]
STREET_SPECTRUM = [(15, -42), (25, -23), (76, 1), (123, -10.5), (157, -2.5), (293, -6), (545, -12.5),
                   (607, -12), (4370, -27), (16000, -34.5)]


def background(level_db, spectrum):
    """Room tone or far traffic: smoothly coloured diffuse noise."""
    return amp(level_db) * air(colour(spectrum))


def outside(level_db):
    """Keys and door over far traffic and an insect."""
    key_bunch = placed(key_rings() + key_ticks(), lag_samples=-2.32, pan_db=1.5, wet_db=-2.5)
    doorway = placed(door() + hinge_squeak() + whistles(), lag_samples=1.1, pan_db=-1.5, wet_db=-3.0)
    return key_bunch + doorway + insect() + background(level_db, STREET_SPECTRUM)


def indoors(level_db, hum_db):
    """Rubbing and bumps over drone and room tone."""
    return rubs_and_bumps() + hum(hum_db) + background(level_db, ROOM_SPECTRUM)


# starts of the alternating sections, indoors first [t/s]
SECTION_STARTS = [0, .555, 1.56, 4.362, 7.567]
# background in each section [level/dB]
SECTION_BACKGROUND = [-51, -49.5, -52, -50, -52]
# drone in each indoor section [level/dB]
SECTION_HUM = [-50, -54, -68]


def scene():
    """Alternate indoors and outside with very short crossfades."""
    section = np.searchsorted(SECTION_STARTS, TIME_S, side="right") - 1
    level_db = np.array(SECTION_BACKGROUND)[section]
    hum_db = np.array(SECTION_HUM)[section // 2]
    out_share = uniform_filter1d(1. * (section % 2), size=100)  # odd sections are outside
    return out_share * outside(level_db) + (1 - out_share) * indoors(level_db, hum_db)


def record(dry):
    """The microphone droops at the very top; a steep band limit follows."""
    droop_hz, top_hz = 15500, 15900
    return filtered(dry, lambda hz: 1 / (1 + (hz / droop_hz) ** 8) / (1 + (hz / top_hz) ** 200))


dry = scene()
out = record(dry)
log_audio(out)
```